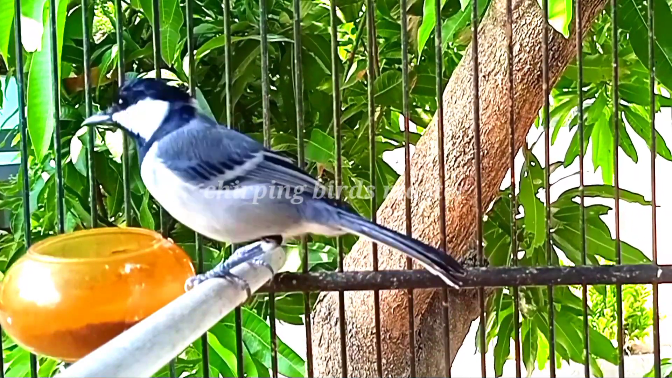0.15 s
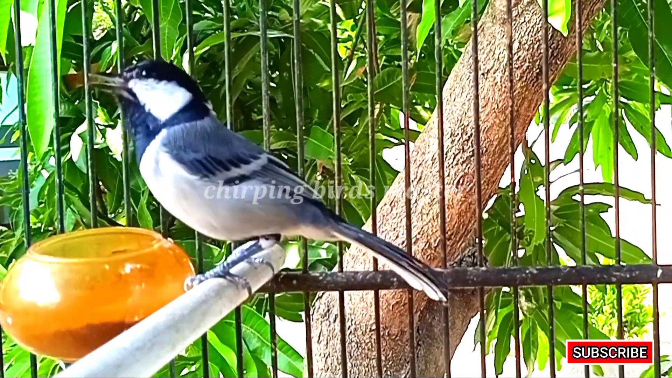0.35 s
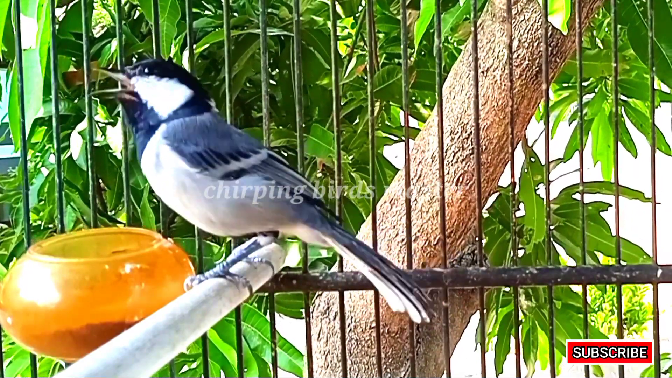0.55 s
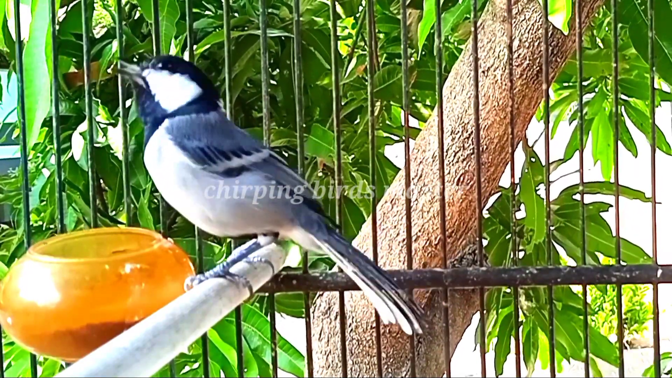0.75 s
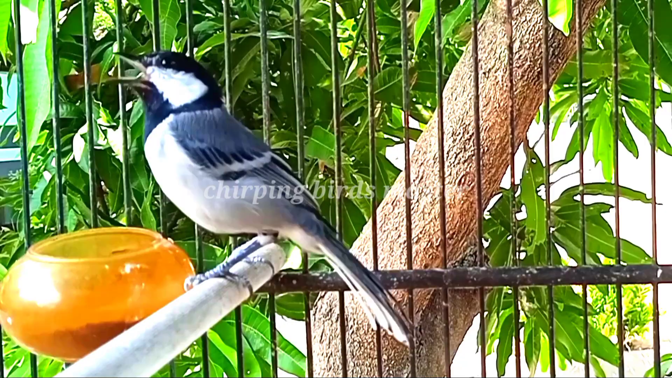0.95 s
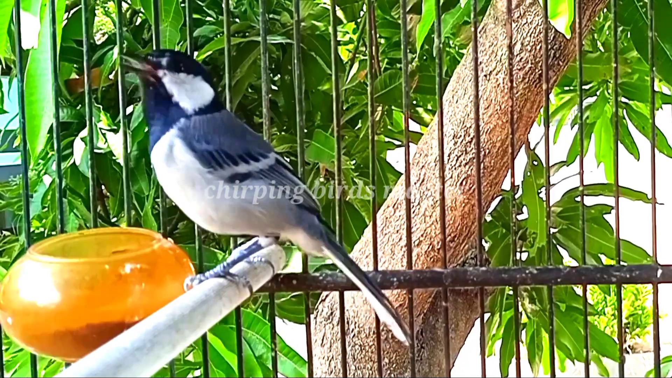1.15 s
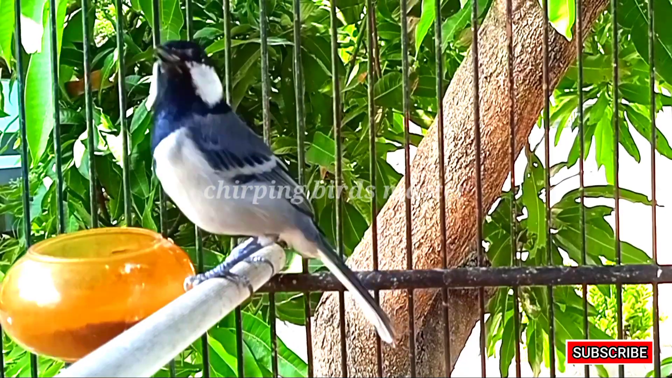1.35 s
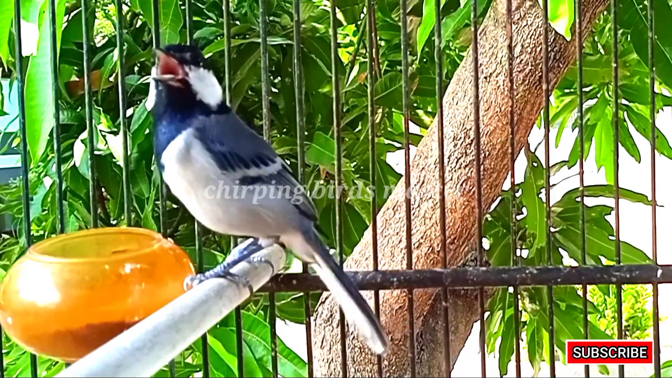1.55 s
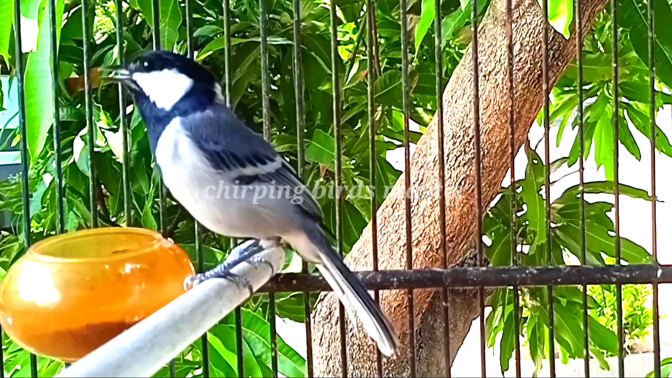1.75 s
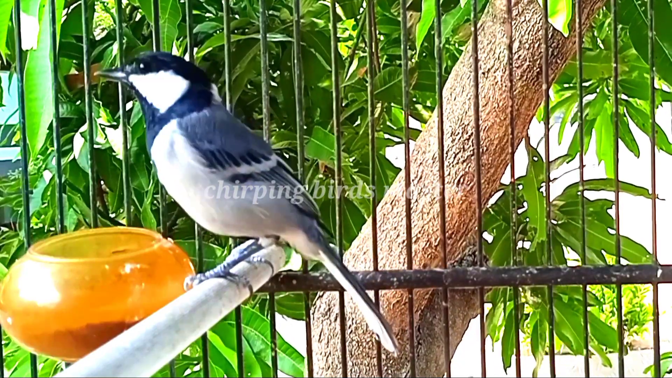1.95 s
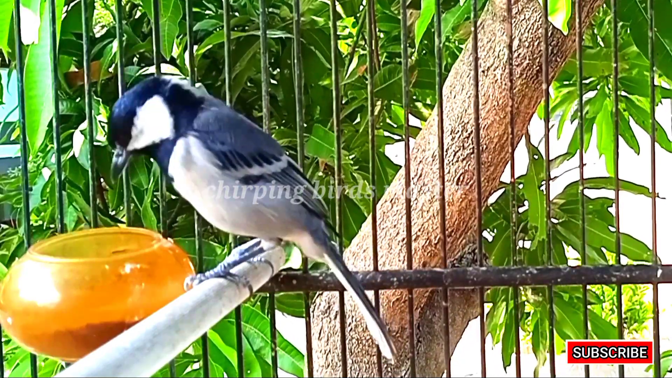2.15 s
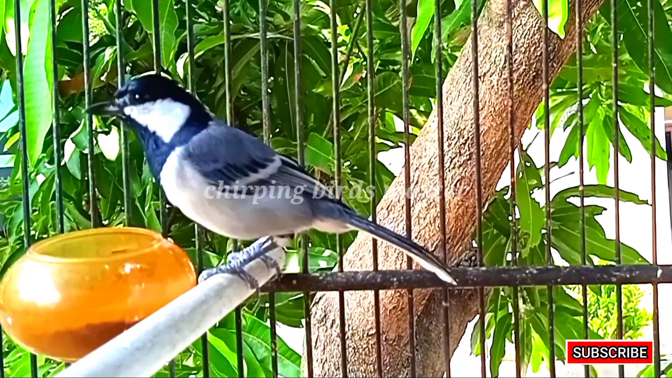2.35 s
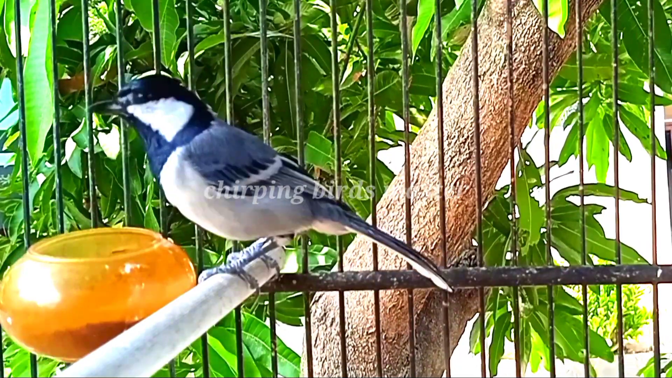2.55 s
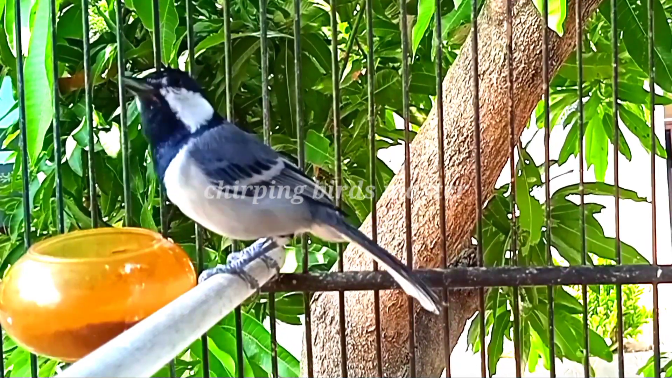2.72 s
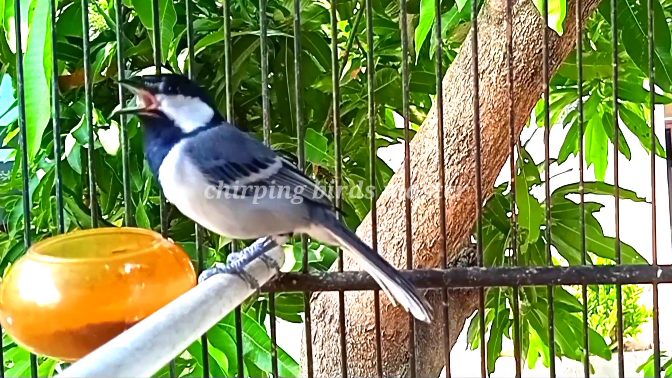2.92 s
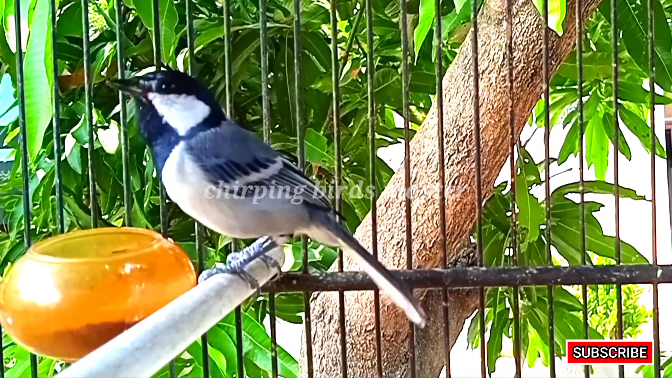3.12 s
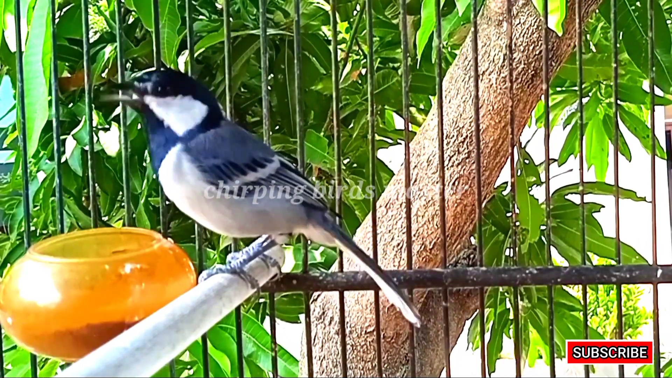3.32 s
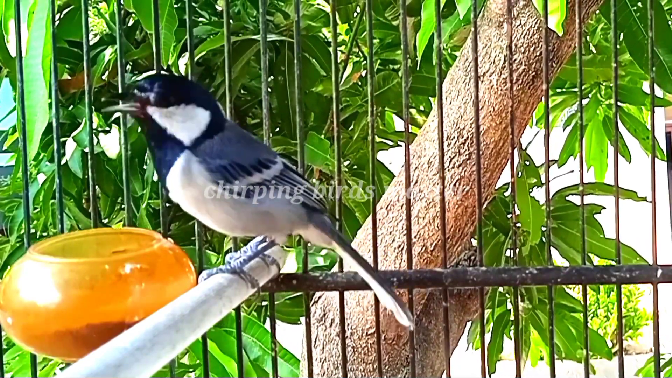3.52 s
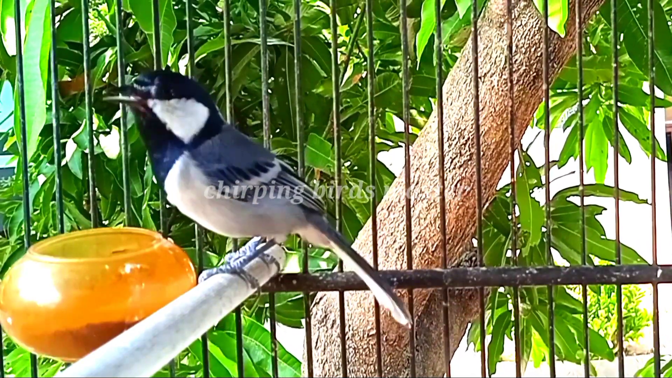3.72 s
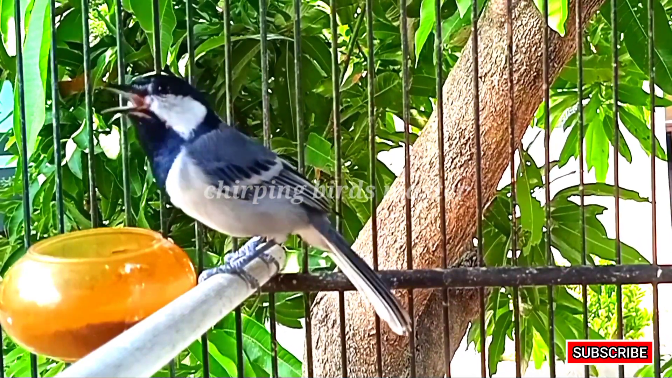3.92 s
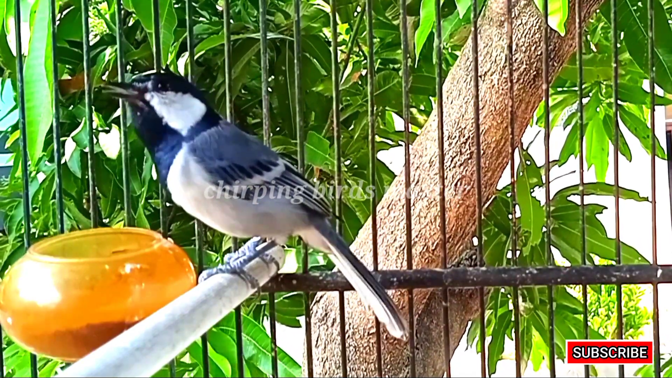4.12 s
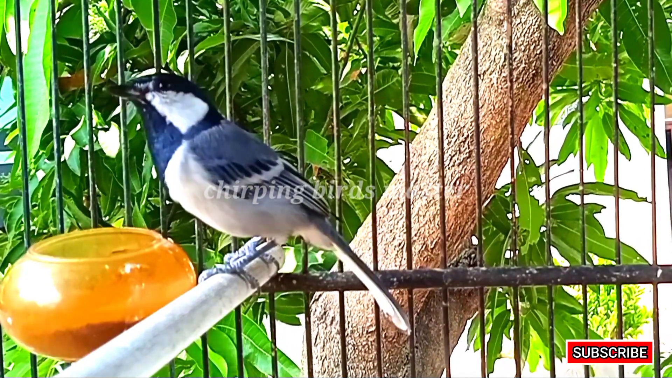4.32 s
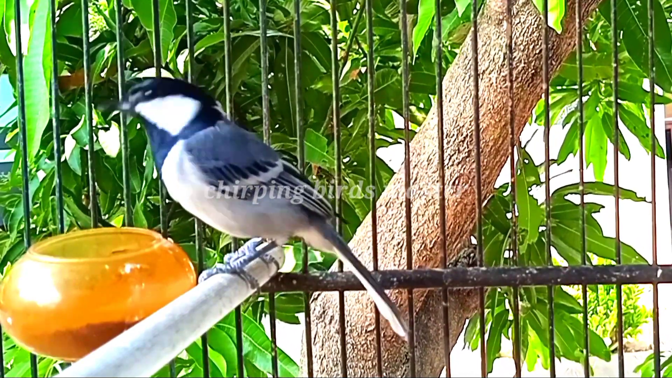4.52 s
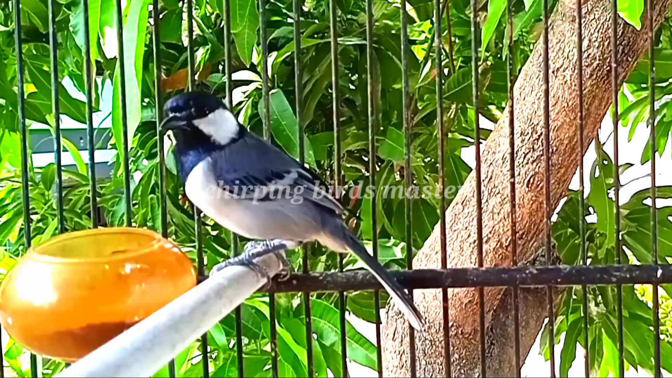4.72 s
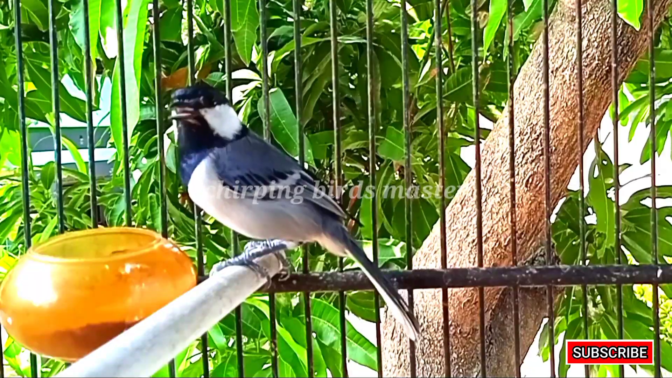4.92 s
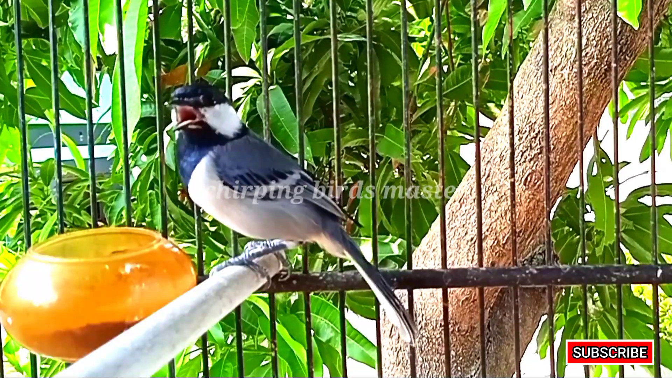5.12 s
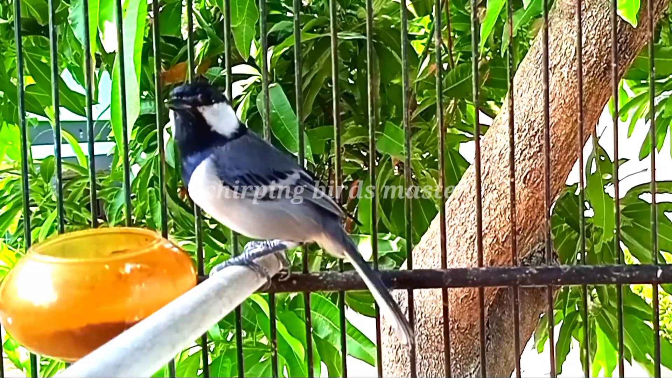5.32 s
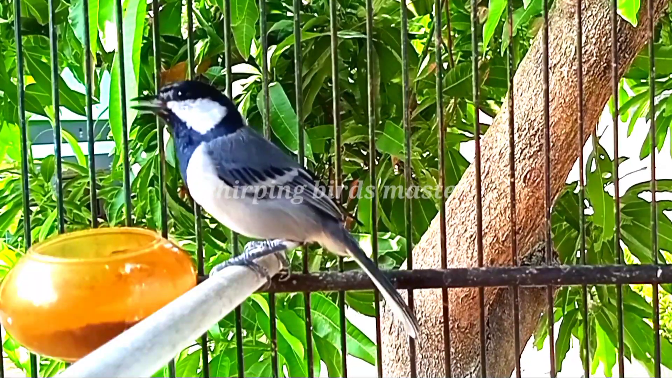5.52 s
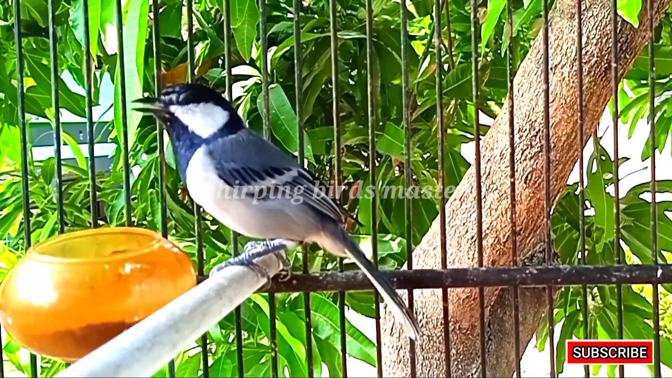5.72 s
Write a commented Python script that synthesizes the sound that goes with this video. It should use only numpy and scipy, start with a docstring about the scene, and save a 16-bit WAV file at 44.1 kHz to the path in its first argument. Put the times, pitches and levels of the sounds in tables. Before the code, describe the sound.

A small caged songbird sings loud, high, see-sawing whistles close by, while other birds whistle farther off and the cage rattles lightly.

```python
"""A caged tit on a porch sings a see-saw song, its syrinx a gliding, nearly pure oscillator: a rising
slur and a loud swooping whistle in turn, then a second, spikier phrase. Other birds whistle farther
off, two bursts of knocks set the cage wires vibrating, and faint hums and drones lie under the outdoor
air. Interference with close reflections makes each glide flutter; the porch adds a short tail."""
import sys
import numpy as np
from scipy import signal
from scipy.fft import rfft, irfft
from scipy.io import wavfile
from scipy.ndimage import uniform_filter1d

SR = 44100
rng = np.random.default_rng(int(sys.argv[2]) if len(sys.argv) > 2 else 0)


def inscribe(sig):
    """Save sig as 16-bit PCM at rate SR to the path in sys.argv[1].

    A 1-D sig is mono; a 2-D sig holds one channel per row.
    Samples are clipped to [-1, 1] before scaling.
    """
    pcm = np.round(np.clip(np.atleast_2d(sig).T, -1, 1) * 32767)
    wavfile.write(sys.argv[1], SR, pcm.astype(np.int16))


N = 258867
TIME = np.arange(N) / SR


def from_db(db):
    """Amplitude ratio of a level in decibels."""
    return 10 ** (np.asarray(db) / 20)


def at_hz(points, hz):
    """Interpolation on a logarithmic frequency axis."""
    f, value = np.transpose(points)
    return np.interp(np.log(np.maximum(hz, 1)), np.log(f), value)


def noise(spectrum):
    """Spectral shaping of white noise, scaled to unit rms."""
    gain = from_db(at_hz(spectrum, np.fft.rfftfreq(N, 1 / SR)))
    x = irfft(rfft(rng.standard_normal(N)) * gain, N)
    return x / np.sqrt(np.mean(x ** 2) + 1e-20)


def drift(t, rate):
    """Random modulation of spread about 1, with `rate` new values a second."""
    return np.interp(t * rate, np.arange(400), rng.standard_normal(400))


def note_time(length):
    """Sample times of one note."""
    return np.arange(int(length * SR)) / SR


def add(out, s, sound):
    """Superposition of a sound starting at time s."""
    i = max(round(s * SR), 0)
    out[i:i + len(sound)] += sound[:max(N - i, 0)]


# spectrum of the outdoor air: f/Hz, relative spectral level/dB
AIR_SPECTRUM = [(25, -28.5), (45, -12), (75, -3.5), (140, 1.5), (270, -5.5), (500, -3), (900, -8.5),
                (1500, -11.5), (3000, -16.5), (6000, -22.5), (9000, -31.5), (12000, -39), (15000, -44.5)]
# its slow rise and fall: t/s, level/dB
AIR_SWELL = [(0.0, -68), (0.6, -63.5), (1.19, -66), (1.42, -64.5), (3.94, -66.5), (4.58, -64.5),
             (4.82, -61), (5.87, -63.5)]
def outdoor_air(gain_db=1.0):
    """Broadband noise, strongest in the bass, under slow amplitude modulation."""
    return noise(AIR_SPECTRUM) * from_db(gain_db + np.interp(TIME, *np.transpose(AIR_SWELL)))


# far-off drones: start t/s, end t/s, f/Hz, level/dB
FAR_DRONES = [(0, .25, 1018, -73), (0.351, .6, 808, -65.5), (0.549, 0.734, 961, -62),
              (1.412, 1.599, 1015, -62), (2.802, 3.697, 767, -73.5), (4.848, 5.87, 381.7, -68.5)]
def drones(width_hz=45, fade_s=.09):
    """Random modulation of amplitude and phase on the way smears each distant tone into a narrow band."""
    out = np.zeros(N)
    for start, end, hz, level_db in FAR_DRONES:
        t = note_time(end - start + fade_s)
        phase = 2 * np.pi * hz * t
        tone = drift(t, width_hz) * np.sin(phase) + drift(t, width_hz) * np.cos(phase)
        fade = np.clip(np.minimum(2 * t, t[-1] - t) / fade_s, 0, 1)
        add(out, start, from_db(level_db) * tone * fade)
    return out


# spells of low hum: start t/s, end t/s, f/Hz, level/dB
HUM_SPELLS = [(.25, 2.2, 100, -72.5), (1.6, 2.8, 76, -76), (4.8, 6, 75, -71)]
def hum(waver_db=4.5, wander_hz=9.7, fade_s=0.068):
    """Low sinusoids waver under random frequency and amplitude modulation."""
    out = np.zeros(N)
    for start, end, hz, level_db in HUM_SPELLS:
        phase = 2 * np.pi * np.cumsum(hz + wander_hz * drift(TIME, 14)) / SR
        fade = np.clip(np.minimum(TIME - start, end - TIME) / fade_s, 0, 1)
        out += np.sqrt(2) * np.sin(phase) * fade * from_db(level_db + waver_db * drift(TIME, 54))
    return out


def jittered_phase(t, hz, jitter, rate):
    """Phase is the integral of frequency, which here trembles slightly."""
    return 2 * np.pi * np.cumsum(hz * (1 + jitter * drift(t, rate))) / SR


def envelope_db(t, onset_db, attack_s, release_s, release_db=-22):
    """Attack, sustain and release: a note swells from a faint onset, holds and is let go."""
    attack = np.cos(np.pi / 2 * np.minimum(t / attack_s, 1)) ** 2
    release = np.maximum(1 - (t[-1] - t) / release_s, 0) ** 2
    return onset_db * attack + release_db * release


# response of the close surroundings to the fundamental: f/Hz, gain/dB
SURROUNDINGS = [(2700, -8), (3200, -0.5), (3400, -8), (3700, -1.5), (4050, -7.5), (4400, 5.5), (5450, 1.5),
                (5750, -3), (6100, 6.5), (6420, -3), (6780, 6.5), (7150, -0.5), (7520, 0.5), (8200, -9)]
# overtones of the syrinx: harmonic number, relative level/dB
HARMONICS = [(2, -1.5), (3, -5), (4, -21.5)]
# transmission of overtones by the beak: f/Hz, gain/dB
BEAK_RESPONSE = [(5000, -26.5), (7300, -27), (8600, -31), (10100, -30.5), (12000, -43), (13500, -28),
                 (15000, -21), (16000, -34)]
FACING_DB, TURNED_DB = -1, -4.5   # tilt per harmonic: as the beak turns away, high ones drop fastest
def syrinx(t, hz, level_db, tilt_db, waver_db):
    """Source and filter: a nearly pure oscillation whose weak harmonics are coloured by the beak."""
    hz = uniform_filter1d(hz, size=110, mode="nearest")
    phase = jittered_phase(t, hz, jitter=0.003, rate=310)
    tone = np.sin(phase) * uniform_filter1d(from_db(at_hz(SURROUNDINGS, hz)), size=50, mode="nearest")
    for k, db in HARMONICS:
        gain = from_db(tilt_db * (k - 2.18) + db + at_hz(BEAK_RESPONSE, k * hz) + 1.8 * drift(t, 180))
        anti_alias = np.clip((SR / 2 - k * hz) / (SR / 10), 0, 1)
        tone += gain * np.sin(k * phase) * anti_alias
    gate = np.sin(np.pi / 2 * np.clip(np.minimum(t, t[-1] - t) / .002, 0, 1)) ** 2
    return np.sqrt(2) * tone * gate * from_db(level_db + waver_db * drift(t, 130))


# the tit's rising slurs: t/s, duration/s, scoop depth/Hz, top f/Hz, level/dB
SLUR_NOTES = [(0.432, 0.12, 540, 4760, -23), (0.881, .130, 749, 5050, -19), (1.338, 0.14, 850, 4800, -19),
              (1.817, 0.14, 714, 4540, -23), (2.829, 0.12, 550, 5290, -24), (3.288, .129, 800, 4910, -18.5),
              (3.749, .139, 719, 4570, -21), (4.245, .139, 786, 4726, -23)]
def slurs(scoop_s=.04, plateau_hz=3159, climb_hz_per_s=3900, bend_hz_per_s2=70000, flick_s=.0065):
    """Frequency modulation in three stages: a scoop, a climbing plateau and an upward flick."""
    out = np.zeros(N)
    for s, length, scoop_hz, top_hz, level_db in SLUR_NOTES:
        t = note_time(length)
        flick = np.exp((t - length) / flick_s)
        hz = plateau_hz + climb_hz_per_s * t - scoop_hz * np.maximum(1 - t / scoop_s, 0) ** 1.5
        hz += bend_hz_per_s2 * np.maximum(t - length / 2, 0) ** 2
        hz += (top_hz - hz[-1]) * flick
        accent = np.exp(-(t / scoop_s) ** 4)
        sag = np.exp(-.5 * ((t - 0.58 * length) / 0.018) ** 2)
        effort_db = 0.5 * accent - 2.5 * sag - flick
        db = level_db + effort_db + envelope_db(t, onset_db=-15, attack_s=0.03, release_s=0.0012)
        add(out, s, syrinx(t, hz, db, FACING_DB, waver_db=3.2))
    return out


def glides(notes, contour, tilt_db, accent_db=0, accent_s=0.022, **envelope):
    """Time scaling and transposition of one practised frequency contour give each note."""
    out = np.zeros(N)
    for s, length, ratio, level_db, *_ in notes:
        t = note_time(length)
        hz = ratio * np.interp(t / length, *np.transpose(contour))
        db = level_db + envelope_db(t, **envelope) + accent_db * np.exp(-(t / accent_s) ** 2)
        add(out, s, syrinx(t, hz, db, tilt_db, waver_db=2.75))
    return out


# the tit's loud swoops: t/s, duration/s, frequency ratio, level/dB, puff level/dB
SWOOP_NOTES = [(0.649, 0.16, 1.008, -16, -64.5), (1.102, .16, 1.017, -15.5, -48.5),
               (1.572, .16, 1.017, -16, -50.5), (3.045, .16, 1.009, -15.5, -50),
               (3.505, 0.17, 1.021, -16, -51.5), (3.987, .162, 0.9885, -17.5, -55.5)]
# their contour: fraction of the note, f/Hz
SWOOP_CONTOUR = [(0, 6050), (.12, 6600), (.215, 7650), (.28, 6720), (.44, 5220), (0.551, 4900),
                 (0.688, 4847), (.89, 5170), (1.001, 6060)]
def swoops():
    """A wide frequency sweep: up to a crest, down through a trough and up again."""
    return glides(SWOOP_NOTES, SWOOP_CONTOUR, FACING_DB, accent_db=3.5,
                  onset_db=-23, attack_s=0.022, release_s=0.0059)


# spectrum of a puff or thump: f/Hz, relative spectral level/dB
THUMP_SPECTRUM = [(40, -15), (90, 2.5), (250, -4), (450, -7.5), (800, -14), (1300, -22.5), (3000, -49.5)]
# a soft thump on the perch: t/s, level/dB
PERCH_IMPACT = [(2.515, -57)]
def thumps(crest_s=.041, width_s=0.0052):
    """Gaussian pulses of dull noise: a puff at the crest of each swoop and one thump on the perch."""
    pulses = [(s + crest_s, db) for s, *_, db in SWOOP_NOTES] + PERCH_IMPACT
    envelope = sum(from_db(db) * np.exp(-.5 * ((TIME - s) / width_s) ** 2) for s, db in pulses)
    return noise(THUMP_SPECTRUM) * envelope


def far_note(t, hz, level_db, fade_s=0.045, overtone_db=-35):
    """A distant bird's oscillation, almost sinusoidal, swells and fades."""
    phase = jittered_phase(t, hz, jitter=0.0035, rate=180)
    tone = np.sin(phase) + from_db(overtone_db) * (np.sin(2 * phase) + .7 * np.sin(3 * phase))
    swell = np.sin(np.pi / 2 * np.clip(np.minimum(t, 2 * (t[-1] - t)) / fade_s, 0, 1)) ** 2
    return from_db(level_db) * swell * np.sqrt(2) * tone


# other birds' whistles: t/s, duration/s, f/Hz, level/dB
FAR_WHISTLE_NOTES = [(1.911, 0.16, 3409, -41.5), (2.726, 0.272, 3345, -45.5), (3.929, 0.17, 2853, -35),
                     (4.134, 0.2, 2452, -40), (5.019, 0.18, 2658, -36.5), (5.277, 0.233, 3690, -32)]
def far_whistles(arch_hz=48.6):
    """Nearly steady tones whose frequency follows a shallow parabolic arch."""
    out = np.zeros(N)
    for s, length, hz, level_db in FAR_WHISTLE_NOTES:
        t = note_time(length)
        add(out, s, far_note(t, hz - arch_hz * (2 * t / length - 1) ** 2, level_db))
    return out


# other birds' slurs: t/s, duration/s, start f/Hz, end f/Hz, level/dB
FAR_SLUR_NOTES = [(2.236, 0.16, 3230, 2485, -44), (3.082, 0.19, 3090, 2414, -41.5),
                  (3.414, 0.12, 2194, 3273, -39), (3.58, 0.13, 4110, 3677, -39.5),
                  (3.657, 0.17, 3025, 3590, -40.5), (3.704, 0.19, 5015, 4327, -38.5),
                  (4.294, .18, 2946, 2512, -36.5), (4.749, 0.17, 3252, 2953, -36.5),
                  (5.562, 0.1, 2370, 3860, -37.5), (5.652, 0.18, 3565, 4840, -31.5)]
def far_slurs(easing=1.6):
    """Power-law frequency sweeps that flatten towards their end."""
    out = np.zeros(N)
    for s, length, start_hz, end_hz, level_db in FAR_SLUR_NOTES:
        t = note_time(length)
        hz = end_hz + (start_hz - end_hz) * (1 - t / length) ** easing
        add(out, s, far_note(t, hz, level_db))
    return out


# knocks on the cage: t/s, level/dB, rattle T60/s
CAGE_KNOCKS = [(2.46, -56, 0.43), (2.478, -56.5, 0.46), (4.568, -65, 0.23), (4.667, -47.5, 0.7),
               (4.688, -44, 0.12)]
# rattle of the bars: f/Hz, relative spectral level/dB
RATTLE_SPECTRUM = [(300, -34), (850, 12), (1400, 4), (2300, 9), (4000, 2), (5400, 3.5), (6300, 15),
                   (7800, -10), (8800, 1), (11500, -17.5), (13000, -35.5)]
# modes of the wires: f/Hz, relative level/dB, T60/s
WIRE_MODES = [(6000, 0.5, 0.53), (6450, -19, 0.19), (7660, 3, 0.3), (9200, -20.5, 0.097), (11000, -4, 0.39)]
def cage(ring_db=-7, flutter_db=3):
    """Impact excitation: a knock rattles the bars and leaves the wires ringing in damped modes."""
    out, t = np.zeros(N), TIME[:SR]
    wires = sum(from_db(db - 60 * t / t60) * np.sin(2 * np.pi * hz * t) for hz, db, t60 in WIRE_MODES)
    ring = from_db(ring_db) * wires / np.std(wires[:SR // 50])
    for s, level_db, t60 in CAGE_KNOCKS:
        rattle = noise(RATTLE_SPECTRUM)[:SR] * from_db(-60 * t / t60 + flutter_db * drift(t, 230))
        add(out, s, from_db(level_db) * (rattle + ring))
    return out


# twin-peaked notes of the tit's second phrase: t/s, duration/s, frequency ratio, level/dB
TWIN_NOTES = [(4.978, 0.1454, 0.99, -21), (5.479, 0.1473, 0.94, -16.5)]
# their contour: fraction of the note, f/Hz
TWIN_CONTOUR = [(0, 3260), (.35, 3780), (0.429, 4770), (0.496, 6000), (0.562, 4690), (0.662, 4120),
                (.87, 4550), (.96, 5520), (1, 5150)]
def twin_peaks():
    """A sweep with two maxima; with the head turned, directivity weakens the upper harmonics."""
    return glides(TWIN_NOTES, TWIN_CONTOUR, TURNED_DB, onset_db=-20.5, attack_s=.052, release_s=.007)


# spiked notes of the second phrase: t/s, duration/s, frequency ratio, level/dB
SPIKE_NOTES = [(5.226, 0.135, 1, -16), (5.719, 0.1467, 1, -16)]
# their contour: fraction of the note, f/Hz
SPIKE_CONTOUR = [(0, 4943), (.3, 5225), (0.521, 5540), (0.622, 5830), (0.726, 8850), (.85, 7380),
                 (1.002, 6160)]
def spikes():
    """A slow frequency sweep that breaks into one sharp peak, also sung with the head turned."""
    return glides(SPIKE_NOTES, SPIKE_CONTOUR, TURNED_DB, onset_db=-14, attack_s=0.043, release_s=.005)


# reflections from close surfaces: delay/ms, gain/dB
REFLECTIONS = [(2.9, -19), (5.2, -23.5), (8.3, -12.5)]
def close_echoes(x, dull_hz=8500):
    """Interference: delayed, duller copies beat against a gliding tone and make it flutter."""
    dull = signal.sosfilt(signal.butter(2, dull_hz, fs=SR, output="sos"), x)
    return x + sum(from_db(db) * np.interp(TIME - ms / 1000, TIME, dull, left=0) for ms, db in REFLECTIONS)


# reverberation time of the porch: f/Hz, T60/s
PORCH_DECAY = [(500, 0.13), (3000, 0.47), (6000, 0.16), (10000, 0.69), (15000, 0.087)]
def porch_tail(x, gap_s=0.0036, build_s=0.0045):
    """Diffuse reverberation: convolution with unit-energy noise, each band decaying at its own rate."""
    t, response = TIME[:SR], 0
    edges = np.geomspace(250, 16000, 9)
    for low, high in zip(edges, edges[1:]):
        bandpass = signal.butter(2, [low, high], "band", fs=SR, output="sos")
        band = signal.sosfilt(bandpass, rng.standard_normal(SR))
        response += band * from_db(-60 * t / at_hz(PORCH_DECAY, np.sqrt(low * high)))
    response *= 1 - np.exp(-np.maximum(t - gap_s, 0) / build_s)
    return signal.fftconvolve(x, response / np.sqrt(np.sum(response ** 2)))[:N]


# the tit's reverberation relative to its direct sound: t/s, level/dB
TIT_REVERB = [(4.6, -18), (4.9, -20)]
def scene():
    """The direct-to-reverberant ratio falls with distance: the tit is fairly dry, the others diffuse."""
    tit = slurs() + swoops() + twin_peaks() + spikes()
    neighbours = np.array([far_whistles(), far_slurs()])
    direct_share = np.array([0.37, 0.089])   # of the energy: whistles, slurs
    direct = np.sqrt(direct_share) @ neighbours
    scattered = np.sqrt(1 - direct_share) @ neighbours
    tail = porch_tail(from_db(np.interp(TIME, *np.transpose(TIT_REVERB))) * tit + scattered)
    background = outdoor_air() + drones() + hum()
    return (background + close_echoes(tit) + thumps() + direct + cage() + tail)[None]


def record(dry):
    """Band limiting: an elliptic low-pass cuts steeply above 15.8 kHz."""
    return signal.sosfilt(signal.ellip(12, .1, 90, 15800, fs=SR, output="sos"), dry)


dry = scene()
out = record(dry)
inscribe(out)
```